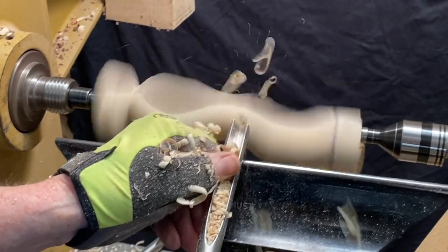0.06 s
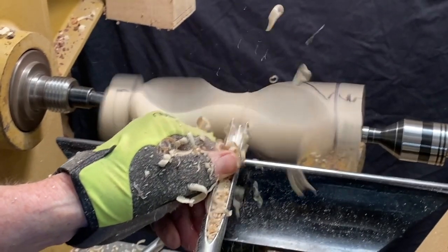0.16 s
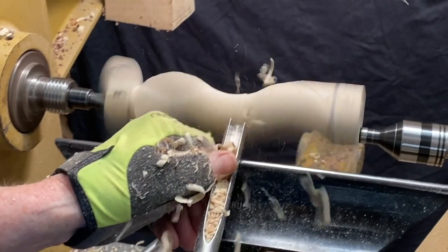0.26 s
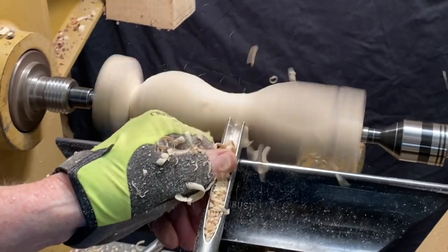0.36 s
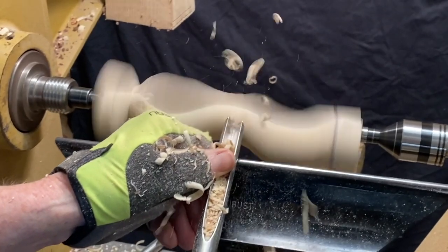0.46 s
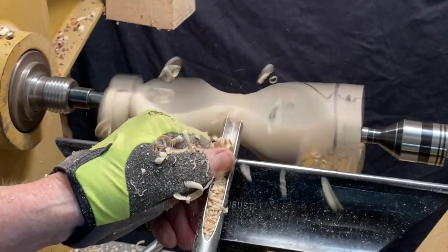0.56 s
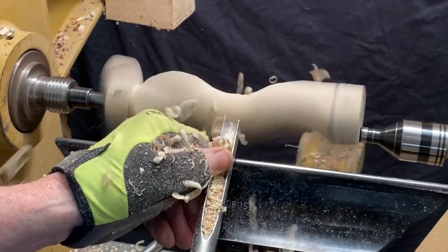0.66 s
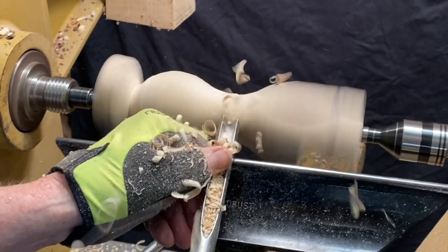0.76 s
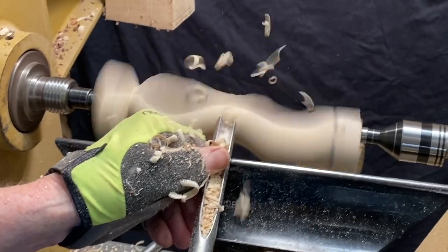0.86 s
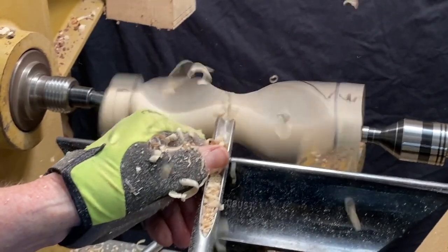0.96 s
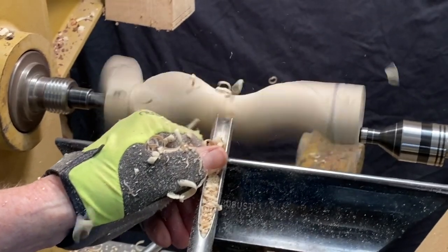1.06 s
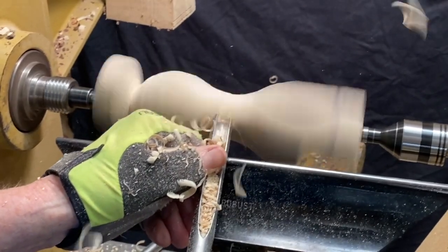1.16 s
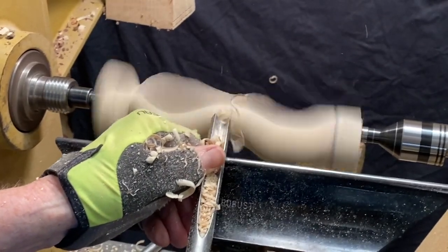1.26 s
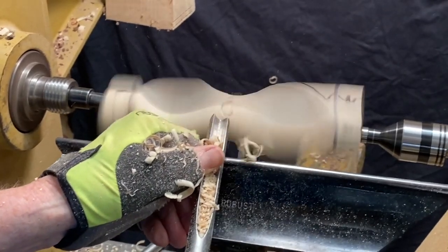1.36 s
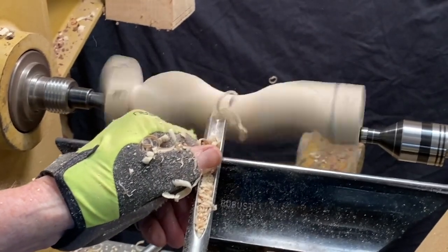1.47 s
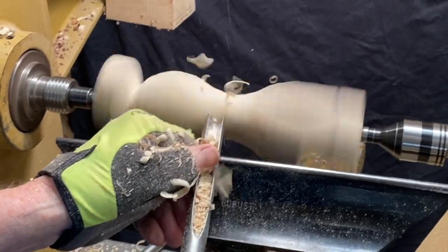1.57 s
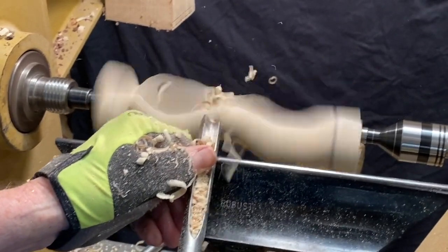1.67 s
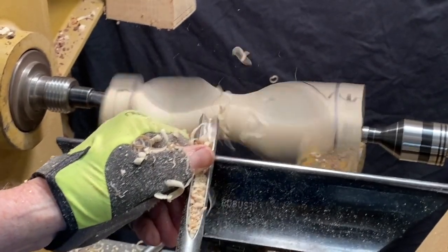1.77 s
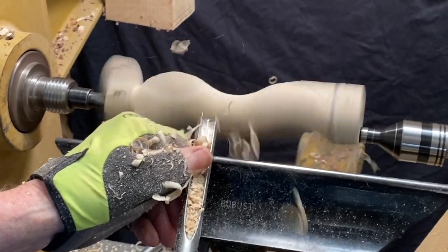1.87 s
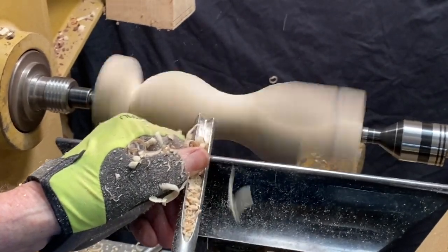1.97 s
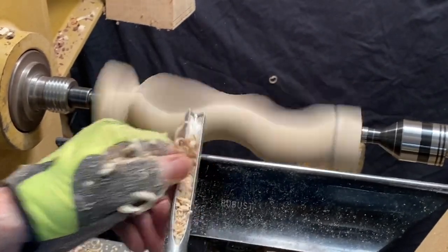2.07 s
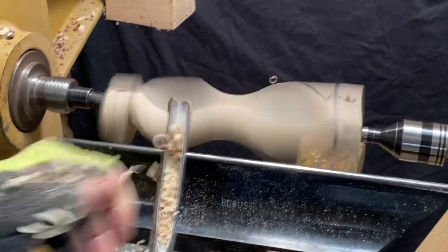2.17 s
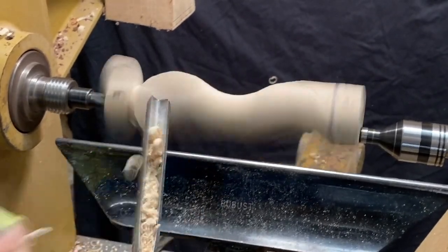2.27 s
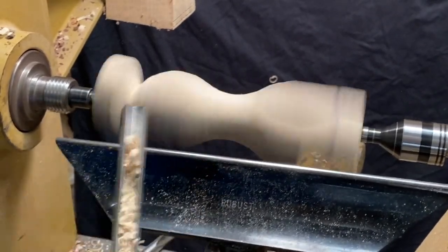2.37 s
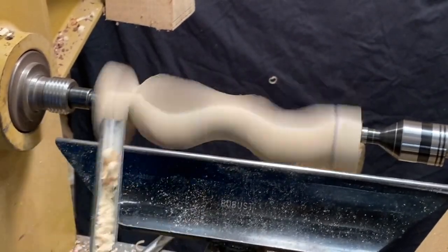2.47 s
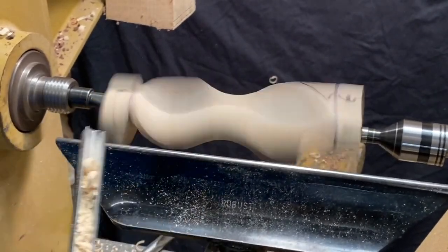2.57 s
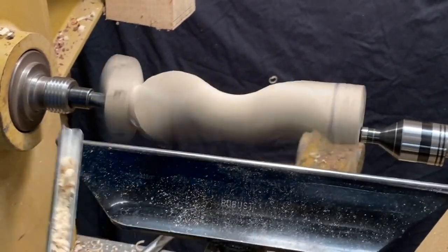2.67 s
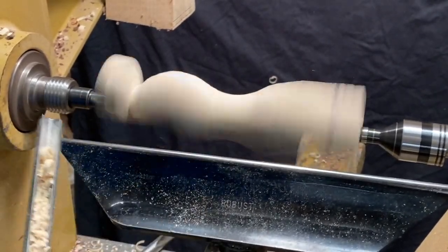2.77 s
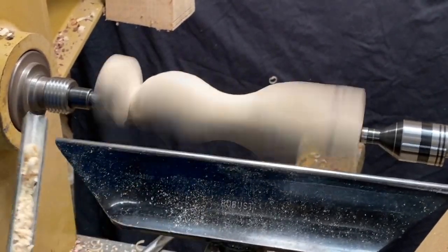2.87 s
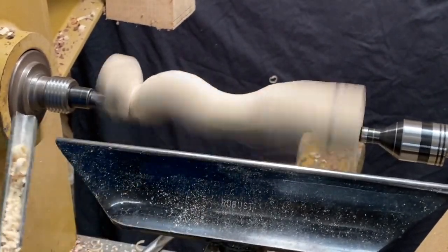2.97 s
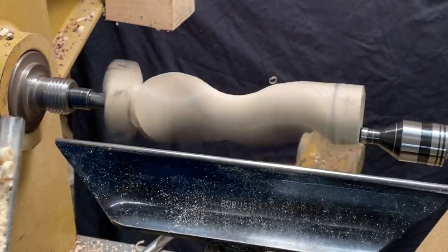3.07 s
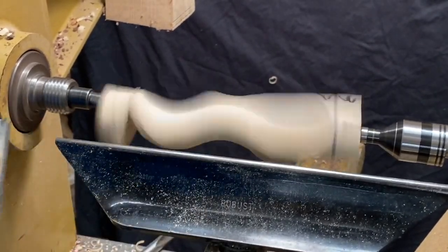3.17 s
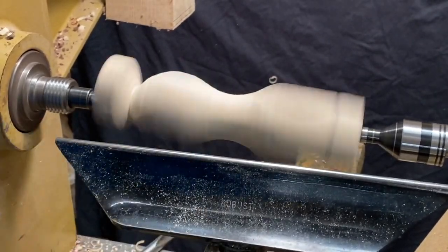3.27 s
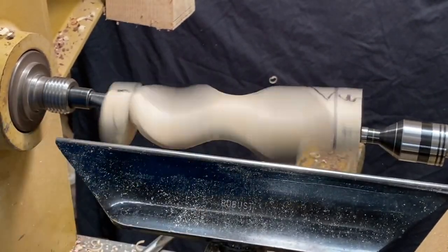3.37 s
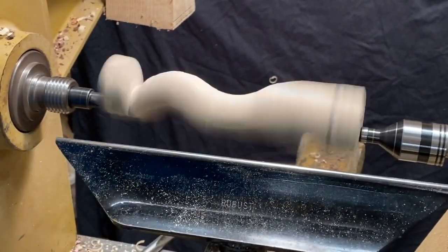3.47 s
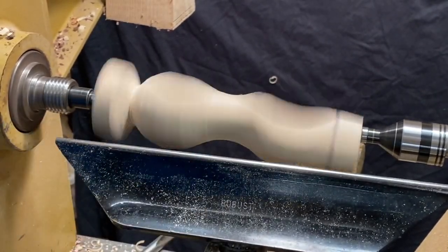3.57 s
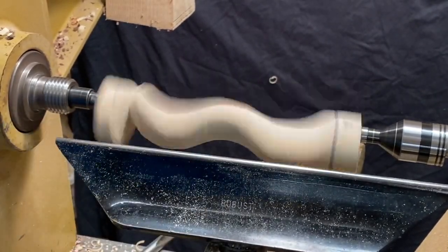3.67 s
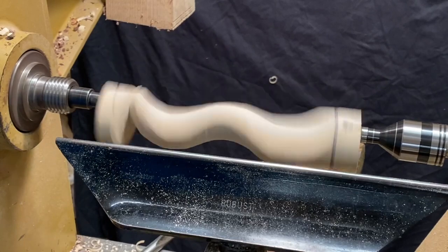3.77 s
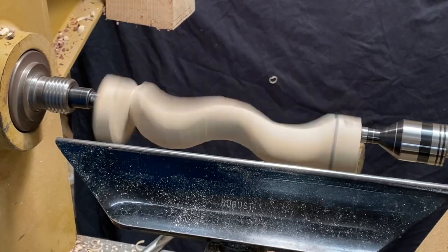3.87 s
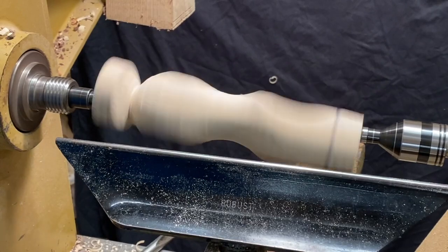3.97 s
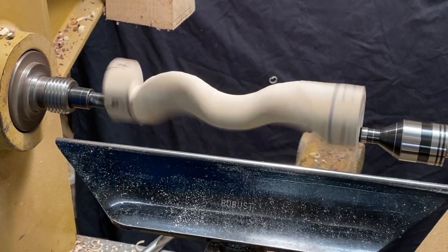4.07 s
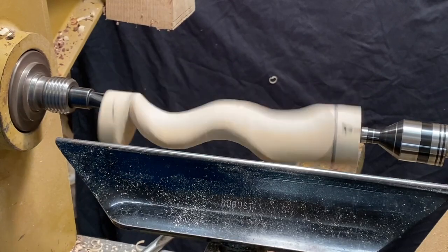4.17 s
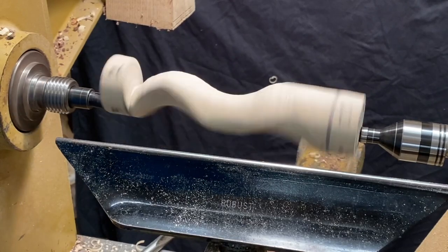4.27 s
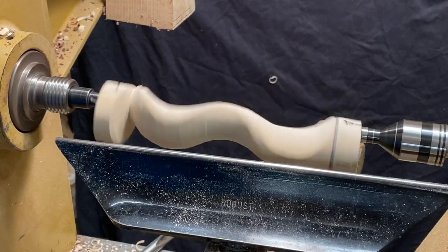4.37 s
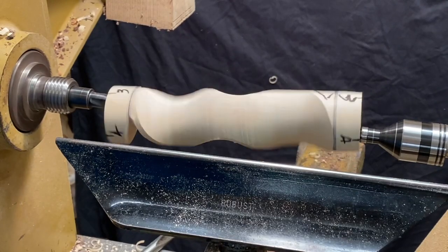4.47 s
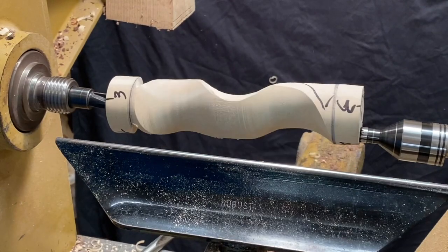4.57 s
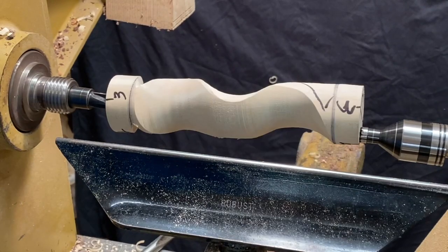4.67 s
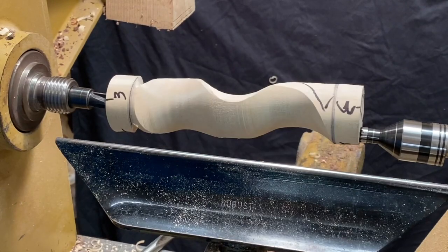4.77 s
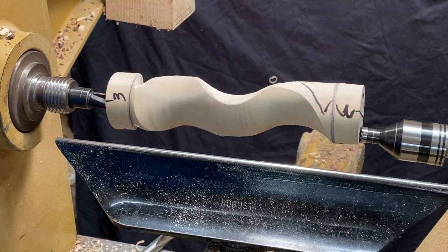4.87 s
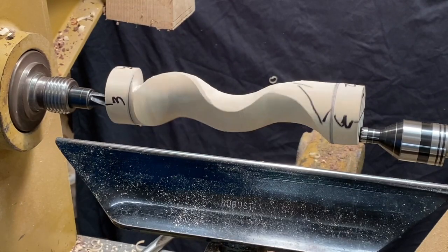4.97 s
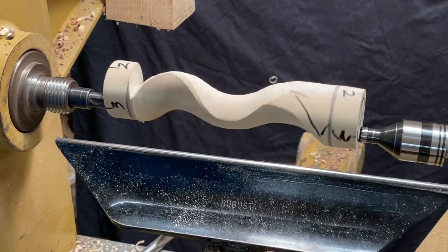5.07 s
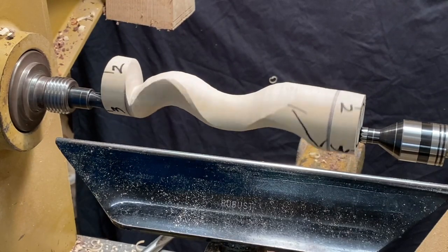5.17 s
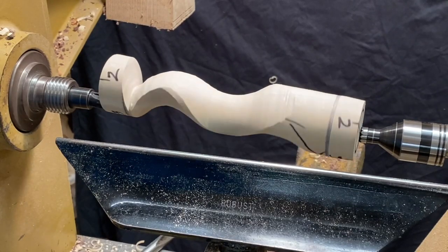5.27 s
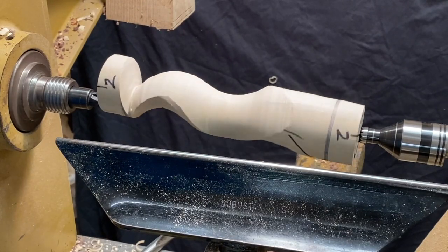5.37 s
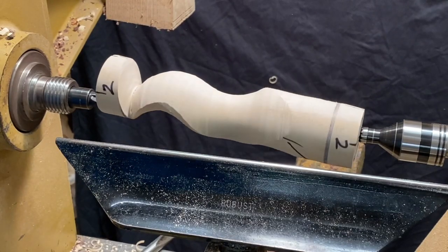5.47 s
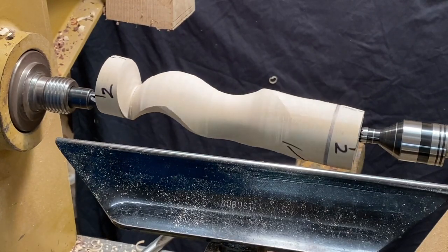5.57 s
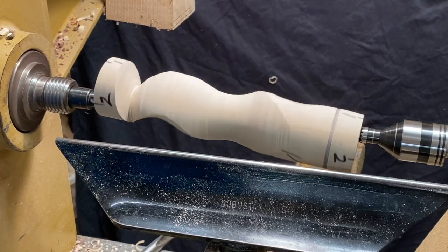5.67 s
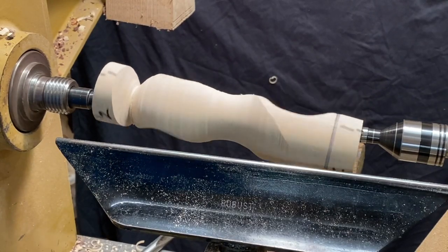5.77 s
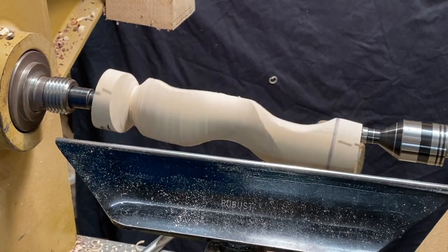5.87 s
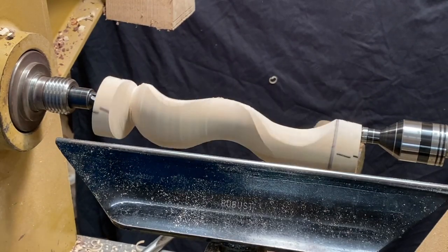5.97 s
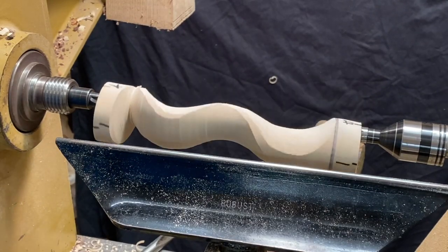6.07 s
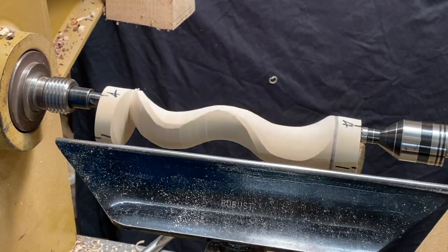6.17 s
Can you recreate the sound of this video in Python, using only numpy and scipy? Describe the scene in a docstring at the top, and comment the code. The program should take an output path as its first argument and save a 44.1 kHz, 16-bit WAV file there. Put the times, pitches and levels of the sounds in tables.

```python
"""A wood lathe turns an off-centre spindle: once a turn it meets the gouge, which knocks, tears and rings.
The gouge lifts, taps the tool rest, and the motor hums on until the stop switch clacks.
The drive then brakes with a thin whistle; the whine slides down through the frame's resonances to a growl.
A beep and a soft clunk mark the stop, and a deep drone swells in the quiet workshop.
Noise through resonant filters makes the cut, and sines locked to the turning make the machine tones."""
import sys
import numpy as np
from scipy import signal
from scipy.fft import rfft, irfft, next_fast_len
from scipy.io import wavfile
from scipy.ndimage import uniform_filter1d, map_coordinates

SR = 44100
rng = np.random.default_rng(int(sys.argv[2]) if len(sys.argv) > 2 else 0)


def store_pcm(level_fs):
    """Save levels as 16-bit WAV."""
    pcm = np.round(np.clip(level_fs, -1, 1) * 32767).astype(np.int16)
    wavfile.write(sys.argv[1], SR, np.atleast_2d(pcm).T)


N = 274302
T = np.arange(N) / SR
# turns of the fast pulley, and cycles of the motor's supply, for each spindle turn
BELT_RATIO, SUPPLY_RATIO = 3.395, 2.5

# The cut over time. Each row: time in seconds, tearing in dB, ring of the gouge in dB, knocking in dB.
CUT_LEVELS = [(0.0, -29.5, -35.5, -32.5), (0.2, -28, -30, -33), (0.4, -30.5, -33, -35.5),
              (0.68, -29.5, -27.5, -32.5), (0.95, -30.5, -33, -35), (1.25, -35, -39, -41),
              (1.48, -31, -37.5, -39), (1.628, -33.5, -49.5, -37), (1.8, -34, -52, -41.5)]
# Tearing of the edge over one turn. Each row: share of a turn, relative level in dB.
TEAR_OVER_TURN = [(0, -6), (.025, 3), (.1, 5), (.23, 0.5), (.31, 4.5), (.53, 4.5), (.6, -4), (.72, -8),
                  (.84, -12), (1, -9.5)]
# Push of the wood over one turn. Each row: share of a turn, relative level in dB.
PUSH_OVER_TURN = [(0, -7.5), (.05, 5.5), (.11, 0), (.17, 3), (.4, 0), (.72, 0.5), (1, -13.5)]
# Turns on which the edge digs deeper or skims. Each row: start in seconds, extra level in dB.
CATCHES = [(.578, 1.5), (.667, 1), (.712, 4), (.845, 2), (.934, 2), (1.157, 1), (1.201, -2), (1.290, -2.5),
           (1.335, 1.5), (1.602, -2.5), (1.691, 2)]
# The gouge sings briefly. Each row: middle in seconds, half length in seconds, pitch in Hz, level in dB.
CHATTER = [(.148, .006, 2580, -21), (.511, .007, 2500, -24), (.638, .007, 2580, -23),
           (.671, .005, 2580, -21), (.720, .012, 2584, -17), (.849, .005, 2508, -20),
           (.940, .007, 2567, -19), (1.04, .006, 2430, -21), (1.165, .006, 2468, -24)]
# Squeaks of the shavings. Each row: middle in seconds, half length in seconds, place as a share of a turn,
# width as a share of a turn, pitch in Hz, relative level in dB.
SQUEAKS = [(.25, 0.21, .3, 0.093, 4257, -32), (.3, 0.33, 0.37, .047, 5540, -37.5),
           (.25, .3, .5, 0.04, 3490, -38.5), (1.62, 0.3, .35, .2, 5490, -43.5)]
# Spectrum of the tearing. Each row: frequency in Hz, relative density in dB per Hz.
TEAR_COLOUR = [(100, -17.5), (400, -15.5), (900, -2), (1500, -0.5), (2000, -1.5), (2800, -5.5), (4200, -1),
               (6500, -2), (10700, 0), (12500, -2), (15000, -0.5)]
# Spectrum of the knocking. Each row: frequency in Hz, relative density in dB per Hz.
KNOCK_COLOUR = [(30, -26), (100, -9), (200, -8.5), (450, -4.5), (660, -10), (900, 0.5), (1250, -4),
                (1550, -3), (2200, -2.5), (4000, -5.5), (9000, -32)]
# Spectra of the scrape in the knock and of the gouge's ring. Each row: frequency in Hz, relative level in dB.
SCRAPE_COLOUR = [(150, -9.5), (500, -3.5), (1000, 3.5), (2500, -2.5), (9000, -8.0)]
RING_COLOUR = [(1500, -41.5), (2300, 4.0), (2500, 2.0), (2680, -1.5), (3300, -32.5)]
# Resonances of the gouge in the tearing. Each row: frequency in Hz, width in Hz, lift in dB.
GOUGE_MODES = [(1860, 57, 11), (2978, 100, 11.5), (3464.5, 97, 8), (3770, 93, 8), (4479, 190, 4),
               (5070, 130, -2.5), (5490, 180, 12.5), (8660, 307, 14)]
# Resonances of the workpiece. Each row: frequency in Hz, width in Hz, lift in dB.
WORKPIECE_MODES = [(135, 10, 10.5), (202, 12, 15), (362, 14, 16.5), (384, 28, 13.5), (449, 20, 12),
                   (584, 14, 15.5), (705, 60, 4), (832, 14, 6), (896, 45, 8.5), (1135, 40, 11.5),
                   (1238, 18, 8), (1368, 24, 10), (1660, 30, 5), (1956, 30, 8.5), (2200, 25, 9)]
# Resonances in the ring of the gouge. Each row: frequency in Hz, width in Hz, lift in dB.
RING_MODES = [(2322, 30, 16), (2425, 44, 27), (2490, 40, 23), (2556, 40, 32.5), (2612, 55, 25)]
# Spectrum of the tap on the tool rest. Each row: frequency in Hz, relative level in dB.
TAP_COLOUR = [(1500, -16), (4000, -6), (5500, 0.5), (11000, -1), (15000, 2)]

# Touch, slide, snap, end stop and rebound of the stop switch.
# Each row: start in seconds, crack in dB, ring of the box in dB.
SWITCH_EVENTS = [(2.6001, -28, -32.5), (2.6148, -28.5, -40), (2.6173, -14.5, -16), (2.6232, -33, -19.5),
                 (2.646, -36.5, -36)]
# Modes of the switch box. Each row: frequency in Hz, relative level in dB, t60 in seconds.
SWITCH_BOX_MODES = [(370, -18, 0.11), (518, -6, 0.1), (644, 5, 0.074), (706, 10.5, 0.069), (786, -6, 0.091),
                    (1150, 1, 0.09), (1265, 14, 0.041), (1730, -10, 0.08), (1890, -3, 0.07),
                    (2073, -8, 0.11), (2350, -5, 0.13), (2560, -12, 0.13), (2780, -12, 0.13),
                    (3810, 11, 0.06), (4716, -6.5, 0.1)]
# Spectrum of the switch's snap. Each row: frequency in Hz, relative density in dB per Hz.
CRACK_COLOUR = [(200, -9), (1200, -8.5), (2700, 2), (4500, -2.5), (7000, -3.5), (11000, -8.5),
                (15500, -11.5)]
# Spectrum of the rattling box. Each row: frequency in Hz, relative level in dB.
RATTLE_COLOUR = [(150, -12.0), (400, 3.0), (1400, -5), (3500, -9.5), (5500, -19.0), (15000, -20.0)]
# Light ticks of the tool and the slowing spindle. Each row: start in seconds, level in dB.
TICKS = [(2.14, -51), (2.525, -52), (3.662, -50), (4.132, -55), (4.334, -56)]

# Whine of the motor. Each row: multiple of the supply rate, relative level in dB under power, and in dB braking.
WHINE_LINES = [(4, -13, -8), (8, -15, -13.5), (13, -12, -11), (18, -4.5, 6.5), (19, -10, -2.5),
               (20, 2.5, -2), (21, -4, -8.5), (22, -13, 2.5), (24, 0.5, 9), (25, -16, -4.5)]
# Spectrum that colours the whine. Each row: frequency in Hz, relative level in dB.
WHINE_COLOUR = [(40, -26.5), (140, -6), (240, -4.5), (340, -5), (460, -1.5), (560, -3), (700, -8.5),
                (850, -7), (930, -1.5), (1000, -5), (1100, 0.5), (1250, -8), (2000, -14)]
# Resonances of the frame. Each row: frequency in Hz, width in Hz, lift in dB.
FRAME_MODES = [(150, 30, 8), (462, 34, 10), (716, 35, 5.4), (944, 15, 15), (1114, 61, 14),
               (1780, 153.4, 4.6)]
# Sidebands of the drive's switching tone. Each row: distance from it as a multiple of the supply rate,
# relative level in dB under power, and in dB braking.
SIDEBANDS = [(23, 0, 4), (21, -7, 3), (19, -9, -2), (17, -16, -5), (15, -16, -5), (13, -16, -7),
             (9, -11, -3), (7, -10, -6), (5, -6, -8), (3, 1, -3), (1, -4, -3), (-1, .5, 3), (-3, -1.5, 0),
             (-5, -6, -7), (-9, -16, -10), (-16, -6, -10), (-21, -11, -8)]
# Spectrum of the drive's electronic hiss. Each row: frequency in Hz, relative density in dB per Hz.
SWITCHING_HISS = [(6000, -40.5), (10000, -3.5), (12000, -1), (15500, -2)]
# Tones of unbalance. Each row: multiple of spindle speed, relative level in dB.
UNBALANCE = [(2, 10), (BELT_RATIO, 0), (4, 0), (2 * BELT_RATIO, -3)]
# Response of floor and stand. Each row: frequency in Hz, gain in dB.
MOUNTS = [(25, -58), (38, -47), (45, -30.5), (52, -31), (60, -22), (65, -16), (68, 0.5), (73, 2.5), (77, 0),
          (82, -4.5), (88, -25.5), (150, -24.5), (300, -41)]
# Spectrum of the bearings. Each row: frequency in Hz, relative density in dB per Hz.
RUMBLE_COLOUR = [(25, -14.5), (60, 7), (120, 0), (200, -5.5), (450, -8.5), (620, -14.5), (1100, -8.5),
                 (1500, -16.5), (2200, -19), (5000, -29)]
# Resonances that the bearings excite in the housing. Each row: frequency in Hz, width in Hz, lift in dB.
HOUSING_MODES = [(149.8, 42, 3.3), (453.7, 21, 7), (714, 46, 6.31), (933, 17, 6.5), (1105, 160, 6.3),
                 (1747, 130, 6.8)]
# Spectrum of the air round the wood. Each row: frequency in Hz, relative density in dB per Hz.
HISS_COLOUR = [(500, -5), (2000, -3.5), (3200, 2), (4500, 1.5), (7000, 3.5), (8900, 6), (9500, 3.5),
               (11200, -0.5), (12200, -7), (15500, -10)]
# Spectrum of the growl. Each row: frequency in Hz, relative density in dB per Hz.
GROWL_COLOUR = [(100, -17), (250, 3.5), (450, 5), (600, -9), (800, -0.5), (1200, -20), (2500, -46)]
# Resonance in the growl. Each row: frequency in Hz, width in Hz, lift in dB.
GROWL_MODE = [(470, 27, 11.0)]
# Spectrum of the thud at the stop. Each row: frequency in Hz, relative level in dB.
THUD_COLOUR = [(100, 7), (500, 1), (750, -7.0), (1050, 4.0), (1300, -12), (1600, -13), (2050, -21),
               (2600, -22), (9000, -25)]
# Modes of the stopping shaft. Each row: frequency in Hz, relative level in dB, t60 in seconds.
STOP_MODES = [(450, -6, 0.24), (498, -8, 0.2), (577, -2.5, 0.28), (722, -12, 0.2), (930, 0.5, 0.27),
              (1050, 3, 0.065), (1455, -9.5, 0.2), (1620, -6, 0.11), (2030, -13, 0.12)]

# Spectrum of the room's air. Each row: frequency in Hz, relative level in dB.
ROOM_AIR = [(20, -14), (50, 2), (100, -5), (160, -12), (400, -17), (800, -20), (1200, -33), (2500, -39.5),
            (8000, -41), (15500, -48)]
# Steady tones in the workshop. Each row: frequency in Hz, relative level in dB.
ROOM_HUM = [(360, -83), (479, -83), (721, -87), (839.8, -79), (958, -90), (1319, -100)]
# Reverberation of the workshop. Each row: frequency in Hz, t60 in seconds before the life factor.
SHOP_DECAY = [(200, 0.68), (1000, 0.46), (4000, 0.27), (12000, 0.06)]
# Stereo width of machine and room. Each row: frequency in Hz, side gain in dB.
WIDTH = [(30, -9.5), (70, -16), (150, -17), (300, -15), (550, -5), (950, -5.5), (1500, -22.5),
         (3000, -39.5), (8000, -30), (15000, -18.5)]
# Stereo width of the cut and the clicks. Each row: frequency in Hz, side gain in dB.
CUT_WIDTH = [(30, -14), (70, -22.5), (150, -18), (300, -20), (550, -14.5), (950, -9), (1700, -24.5),
             (2500, -21.5), (6000, -21.5), (10000, -13.5), (15000, -10)]
# Phase lead of the left microphone port. Each row: frequency in Hz, lead in radians.
PORT_LEAD = [(7900, 0), (8150, 1.9), (9000, 1.9), (10400, 0), (11800, 0), (12900, -np.pi), (13900, -np.pi),
             (15100, -2 * np.pi)]

RUN_TURNS_PER_S = 22.475  # spindle speed under power
BRAKE_S, BRAKE_TURNS_PER_S2, BRAKE_RISE_S = 2.65, 11.3, 0.4  # the braking current builds up over the rise
LIFT_S, TAP_S = 1.84, 1.9325  # the gouge has left the wood; it taps the tool rest
DRIVE_OFF_S, STOP_S = 4.505, 4.526  # the drive stops switching; the shaft comes to rest
RUN_OUT_DB_PER_S = 171  # the running noises die once the shaft rests
# running noises: level at full speed in dB, growth in dB for tenfold speed, extra dB while braking
HUM_DB, HUM_DB_PER_DECADE = -32, 35
RUMBLE_DB, RUMBLE_DB_PER_DECADE = -46, 27.5
HISS_DB, HISS_DB_PER_DECADE = -59, 9
WHINE_DB, WHINE_DB_PER_DECADE, WHINE_BRAKING_DB = -53, 9, 4
WHISTLE_DB, WHISTLE_DB_PER_DECADE, WHISTLE_BRAKING_DB = -69.5, 11.5, 9.5
SWITCHING_HZ, SWITCHING_HISS_DB = 9993, -76  # the hiss is the same at any speed
GROWL_DB, GROWL_PEAK_S, GROWL_SWELL_S = -59, 4.05, 0.44
DRONE_DB, DRONE_START_S, DRONE_RISE_S = -58.5, 4.77, 0.65
ENTRY_DB, ENTRY_S = 2.5, 0.0053  # the first fibres break with a crack
STRIKE_DB = 23.5  # the wood's arrival strikes the gouge, once a turn
CHIP_COLOUR_DB = 1.5  # spread of colour among the shavings
SNAPS_PER_S, SNAP_DB = 420, -3
SNAP_HZ, SNAP_OCTAVES, SNAP_CYCLES = 4800, .7, 7  # middle pitch, spread, cycles in which a snap fades
TAP_DB = -30  # peak
STOP_RISE_S = 0.0034  # the clunk comes on softly
TOP_HZ = 15790  # band limit


def amp(db):
    """Level: decibels give the ratio of amplitudes."""
    return 10 ** (np.asarray(db) / 20)


def unit(x):
    """Normalisation: a signal is brought to rms 1."""
    return x / np.sqrt(np.mean(x ** 2) + 1e-20)


def along(points, hz):
    """Interpolation: (Hz, value) points are joined on a logarithmic frequency axis."""
    f, v = np.transpose(points)
    return np.interp(np.log(hz + 1), np.log(f + 1), v)


def curves(rows):
    """Interpolation: each column after the time becomes one value per sample."""
    s, *columns = np.transpose(rows)
    return [np.interp(T, s, column) for column in columns]


def wobble(rate):
    """Random modulation: a smooth curve follows random knots, rate of them a second."""
    knots = rng.standard_normal(int(N * rate / SR) + 4)
    return map_coordinates(knots, [T * rate])


def filtered(x, response):
    """Linear filtering: the spectrum is multiplied by a complex response of frequency."""
    size = next_fast_len(N + SR // 2)
    return irfft(rfft(x, size) * response(np.fft.rfftfreq(size, 1 / SR)), size)[..., :N]


def body(x, spectrum, resonances=()):
    """Minimum-phase resonance: a folded cepstrum makes a causal filter, lifted at each resonance."""
    size = 2 * next_fast_len(N // 2 + SR // 4)
    hz = np.fft.rfftfreq(size, 1 / SR)
    lift = 1
    for centre, width, db in resonances:
        lift = lift + (amp(db) ** 2 - 1) / (1 + (2 * (hz - centre) / width) ** 2)
    gain = amp(along(spectrum, hz)) * np.sqrt(np.abs(lift))
    cepstrum = irfft(np.log(gain + 1e-6))
    cepstrum[1:size // 2] *= 2
    cepstrum[size // 2 + 1:] = 0
    return irfft(rfft(x, size) * np.exp(rfft(cepstrum)))[:N]


def decay(s, t60):
    """Exponential damping: a unit step at s falls 60 dB in t60."""
    return (T >= s) * amp(-60 * np.abs(T - s) / t60)


def ringing(s, modes):
    """Modal vibration: a blow at s sets off damped sines."""
    return sum(amp(db) * decay(s, t60) * np.sin(2 * np.pi * hz * (T - s)) for hz, db, t60 in modes)


def tones(turns, orders, blur, rate, carrier_hz=0):
    """Order lines: each sine is locked to the turning and its phase wanders by blur radians."""
    out = np.zeros(N)
    for order, db in orders:
        cycles = carrier_hz * T + order * turns + rng.random()
        out += amp(db) * np.sin(2 * np.pi * cycles + blur * wobble(rate))
    return out


def spindle():
    """Uniform deceleration: steady turns a second, an even fall under the brake, then rest."""
    slowed = BRAKE_TURNS_PER_S2 * np.maximum(T - BRAKE_S, 0)
    return (RUN_TURNS_PER_S - slowed) * (T < STOP_S)


def with_speed(speed, db, db_per_decade):
    """Power law: a running noise grows with speed, down to a tenth of full, and dies after the stop."""
    decades = np.log10(np.maximum(speed / RUN_TURNS_PER_S, .1))
    return amp(db + db_per_decade * decades - RUN_OUT_DB_PER_S * np.maximum(T - STOP_S, 0))


def gouge(turns):
    """Intermittent cutting: off-centre wood meets the edge for a little over half of every turn."""
    tear_db, ring_db, knock_db = curves(CUT_LEVELS)
    angle = (turns + .004) % 1
    bite = unit(amp(np.interp(angle, *np.transpose(TEAR_OVER_TURN))))
    entry = amp(ENTRY_DB) * np.exp(-angle / RUN_TURNS_PER_S / ENTRY_S)
    knock = knocking(angle) * amp(knock_db)
    steel = tearing(bite, entry) * amp(tear_db) + edge_ring(angle, bite, entry) * amp(ring_db)
    # the wood stiffens the steel while it presses, and each shaving loads it differently
    stiffness = .006 * bite + .007 * wobble(25)
    singing = np.minimum(bite, 1) ** 2 * chatter()
    contact = np.clip((LIFT_S - T) / 0.045, 0, 1)
    return contact * (knock + bent(steel, stiffness) + singing + squeaks(angle))


def knocking(angle):
    """Forced vibration: the same surface bumps come round every turn, under a fresh scrape."""
    push = unit(amp(np.interp(angle, *np.transpose(PUSH_OVER_TURN))))
    share = np.linspace(0, 1, 1000)
    relief = rng.standard_normal(len(share)) * amp(np.interp(share, *np.transpose(PUSH_OVER_TURN))) ** 2
    # keeping only the phases makes every multiple of the turning rate equally strong
    surface = irfft(np.exp(1j * np.angle(rfft(relief))))
    bumps = unit(map_coordinates(surface, [angle * len(surface)], mode="grid-wrap"))
    scrape = unit(body(push * fibres(spread_db=4.5), SCRAPE_COLOUR))
    force = amp(0.72 * wobble(60)) * (bumps * np.sqrt(push) + amp(-7.5) * scrape)
    return unit(body(force, KNOCK_COLOUR, WORKPIECE_MODES))


def tearing(bite, entry):
    """Fracture noise: breaking fibres excite the gouge, more strongly where the edge digs deeper."""
    depth = amp(1.3 * wobble(160) + sum(db * decay(s, t60=0.06) for s, db in CATCHES))
    breaking = patchy(fibres(spread_db=1.0), CHIP_COLOUR_DB) + snaps()
    return unit(body(depth * np.hypot(bite, entry) * breaking, TEAR_COLOUR, GOUGE_MODES))


def edge_ring(angle, bite, entry):
    """Impulse and noise excitation: a strike each turn and the fibres drive the gouge's modes."""
    strike = amp(STRIKE_DB) * (np.diff(angle, prepend=0) < 0)
    rubbing = np.hypot(bite ** 1.6, entry) * fibres(spread_db=2.0)
    return unit(body(strike + rubbing, RING_COLOUR, RING_MODES))


def fibres(spread_db):
    """Amplitude-modulated noise: dense snaps of wood fibres vary in size."""
    return rng.standard_normal(N) * amp(spread_db * wobble(2500))


def patchy(x, depth_db):
    """Spectral modulation: brief random patches are brighter or duller, as shavings tear differently."""
    z = signal.stft(x, nperseg=256)[2]
    field = uniform_filter1d(rng.standard_normal(z.shape), size=7, axis=0)
    field = uniform_filter1d(field, size=4, axis=1)
    return signal.istft(z * amp(depth_db * unit(field)), nperseg=256)[1][:N]


def snaps():
    """Granular impulses: single fibres break as damped sines of random time, pitch and size."""
    start, pitch, size = np.split(rng.random((int(SNAPS_PER_S * N / SR), 3)), 3, axis=1)
    t = np.arange(SR // 100) / SR
    hz = SNAP_HZ * 2 ** (SNAP_OCTAVES * np.sqrt(3) * (2 * pitch - 1))
    damping = np.exp(-hz * t / SNAP_CYCLES)
    grains = amp(10 * size) * np.sqrt(hz) * damping * np.sin(2 * np.pi * hz * t)
    at = (start * N).astype(int) + np.arange(len(t))
    return amp(SNAP_DB) * unit(np.bincount(at.ravel(), grains.ravel(), N)[:N])


def bent(x, sharpen):
    """Frequency modulation: uneven reading shifts the pitch by a small share about its local mean."""
    shift = np.cumsum(sharpen - uniform_filter1d(sharpen, SR // 5))
    return map_coordinates(x, [np.arange(N) + shift], mode="mirror")


def chatter():
    """Self-excited vibration: now and then the edge locks into the wood and the gouge sings."""
    flutter = .35 * wobble(200)
    out = np.zeros(N)
    for s, length, hz, db in CHATTER:
        out += amp(db) * np.exp(-((T - s) / length) ** 2) * np.sin(2 * np.pi * hz * T + flutter)
    return out


def squeaks(angle):
    """Narrow-band squeal: shavings sound at the same angle over several turns."""
    out = np.zeros(N)
    for s, length, at, width, hz, db in SQUEAKS:
        squeal = np.sqrt(8) * np.sin(2 * np.pi * hz * T + 1.3 * wobble(350))
        window = np.exp(-((angle - at) / width) ** 2 - ((T - s) / length) ** 2)
        out += amp(db + 2.6 * wobble(25)) * window * squeal
    return out


def tap():
    """Impact: steel on steel gives a bright little click that rings the gouge."""
    touch = body(rng.standard_normal(N) * decay(TAP_S, t60=0.025), TAP_COLOUR, GOUGE_MODES)
    return amp(TAP_DB) * touch / np.max(np.abs(touch))


def crack_noise():
    """Broadband excitation: coloured noise supplies the switch's cracks and the ticks."""
    return unit(body(rng.standard_normal(N), CRACK_COLOUR))


def switch():
    """Impact and modal response: each contact of the switch cracks and rings its box."""
    crack = crack_noise()
    rattle = unit(body(rng.standard_normal(N), RATTLE_COLOUR))
    out = np.zeros(N)
    for s, crack_db, box_db in SWITCH_EVENTS:
        box = amp(-18.0) * ringing(s, SWITCH_BOX_MODES) + amp(-17.0) * rattle * decay(s, t60=0.18)
        onset = 1 - decay(s, t60=0.026)
        out += amp(crack_db) * crack * decay(s, t60=0.014) + amp(box_db) * onset * box
    return out


def ticks():
    """Light impacts: the tool and the slowing spindle give short bursts of noise."""
    return crack_noise() * sum(amp(db) * decay(s, t60=0.033) for s, db in TICKS)


def motor(speed, turns):
    """Unbalance: the stand answers most near one pitch, so each tone swells as it slides through."""
    hum = np.zeros(N)
    for order, db in UNBALANCE:
        hum += amp(along(MOUNTS, order * speed)) * tones(turns, [(order, db)], blur=0.2, rate=2.7)
    return hum * with_speed(speed, HUM_DB, HUM_DB_PER_DECADE)


def supply_tones(table, turns, braking, waver, fade_db, carrier_hz=0):
    """Harmonic excitation: braking shifts load among the supply's multiples and makes them waver more."""
    out = np.zeros(N)
    unrest = .35 + .65 * braking
    for multiple, driven_db, braked_db in table:
        level_db = driven_db + (braked_db - driven_db) * braking + unrest * fade_db * wobble(13)
        orders = [(round(multiple) * SUPPLY_RATIO, 0)]
        out += amp(level_db) * tones(turns, orders, waver * unrest, rate=45, carrier_hz=carrier_hz)
    return out


def whine(speed, turns, braking):
    """Resonance: the motor's tones swell as they pass the resonances of the frame."""
    lines = supply_tones(WHINE_LINES, turns, braking, waver=.55, fade_db=2)
    lines = lines * amp((1 + 1.5 * braking) * wobble(170))
    level = with_speed(speed, WHINE_DB + WHINE_BRAKING_DB * braking, WHINE_DB_PER_DECADE)
    return unit(body(lines, WHINE_COLOUR, FRAME_MODES)) * level


def drive(speed, turns, braking):
    """Carrier modulation: sidebands round the switching tone whistle, much louder in braking."""
    whistle = supply_tones(SIDEBANDS, turns, braking, waver=1, fade_db=3, carrier_hz=SWITCHING_HZ)
    level = with_speed(speed, WHISTLE_DB + WHISTLE_BRAKING_DB * braking, WHISTLE_DB_PER_DECADE)
    electronics = unit(body(rng.standard_normal(N), SWITCHING_HISS)) * amp(SWITCHING_HISS_DB)
    powered = np.clip((DRIVE_OFF_S - T) / .02, 0, 1)
    return powered * (whistle * level + electronics)


def bearings_and_air(speed, turns):
    """Flow and rolling noise: bearings rumble and air hisses round the wood, swaying once a turn."""
    swish = amp(0.48 * np.sin(2 * np.pi * turns))
    rumble = unit(body(rng.standard_normal(N), RUMBLE_COLOUR, HOUSING_MODES))
    hiss = unit(body(fibres(spread_db=2.0), HISS_COLOUR))
    rumble_level = with_speed(speed, RUMBLE_DB, RUMBLE_DB_PER_DECADE)
    return swish * (rumble * rumble_level + hiss * with_speed(speed, HISS_DB, HISS_DB_PER_DECADE))


def growl(turns):
    """Roughness: at a crawl the braked motor judders and the frame answers with a low growl."""
    judder = amp(1.4 * np.sin(2 * np.pi * BELT_RATIO * turns)) * fibres(spread_db=0.5)
    swell = np.exp(-((T - GROWL_PEAK_S) / GROWL_SWELL_S) ** 2)
    return unit(body(judder, GROWL_COLOUR, GROWL_MODE)) * amp(GROWL_DB) * swell


def standstill():
    """Tone bursts and damped modes: the drive holds the shaft with hum and beep, then a soft clunk."""
    beep = np.sin(2 * np.pi * 7000 * T) + amp(-3) * np.sin(4 * np.pi * 7000 * T)
    beep = amp(-55) * beep * np.exp(-((T - DRIVE_OFF_S) / .016) ** 2)
    hold = np.sin(2 * np.pi * 150 * T) + amp(-1.5) * np.sin(2 * np.pi * 100 * T)
    hold = amp(-56.5) * hold * np.exp(-((T - 4.49) / 0.1) ** 2)
    thud = unit(body(rng.standard_normal(N), THUD_COLOUR)) * decay(STOP_S, t60=0.34)
    clunk = amp(-51) * thud + amp(-53.0) * ringing(STOP_S, STOP_MODES)
    rise = np.clip((T - STOP_S) / STOP_RISE_S, 0, 1)
    return beep + hold + rise * clunk


def walls(x, life):
    """Diffuse reverberation: noise decays at each frequency's own rate; life scales the t60."""
    hz, t, z = signal.stft(rng.standard_normal(SR // 2), SR, nperseg=256)
    fall = amp(-60 * t / (life * along(SHOP_DECAY, hz)[:, None]))
    tail = signal.istft(z * fall, SR, nperseg=256)[1]
    return signal.fftconvolve(x, tail / np.linalg.norm(tail))[:N]


def workshop():
    """Background noise: still air, the hum of other equipment and a late drone, a little to the right."""
    hum = np.zeros(N)
    for hz, db in ROOM_HUM:
        hum += amp(db) * np.sqrt(2) * np.sin(2 * np.pi * hz * T + .2 * wobble(5))
    air, spread = (amp(-67) * unit(body(noise, ROOM_AIR)) for noise in rng.standard_normal((2, N)))
    swell = 1 - np.exp(-np.maximum(T - DRONE_START_S, 0) / DRONE_RISE_S)
    drone = amp(DRONE_DB) * swell * np.sqrt(2) * np.sin(2 * np.pi * 50 * T + .4 * wobble(4))
    mid = (hum + drone) * amp(wobble(6.7)) + air
    side = filtered(spread, lambda hz: amp(along(WIDTH, hz)))
    return np.array([mid + side, mid - side]) * amp([[-.8], [.8]])


def scene():
    """Superposition: cut, machine and their reverberation add to the motor's hum and the workshop."""
    speed = spindle()
    turns = np.cumsum(speed) / SR
    braking = np.clip((T - BRAKE_S) / BRAKE_RISE_S, 0, 1)
    work = gouge(turns) + tap() + switch() + ticks()
    machine = whine(speed, turns, braking) + drive(speed, turns, braking)
    machine = machine + bearings_and_air(speed, turns) + growl(turns) + standstill()
    mid = work + machine + amp(-15) * walls(work + machine, life=1)
    work_side = filtered(walls(work, life=0.81), lambda hz: amp(along(CUT_WIDTH, hz)))
    machine_side = filtered(walls(machine, life=0.81), lambda hz: amp(along(WIDTH, hz)))
    side = work_side + machine_side
    lathe = np.array([mid + side, mid - side]) * amp([[-.1], [.1]])
    return lathe + motor(speed, turns) * amp([[-.4], [.4]]) + workshop()


def record(dry):
    """Phase difference and band limit: the left port leads in the treble; a low-pass ends the band."""
    def ports(hz):
        """Transfer function: left is the reference and right is turned by the lead."""
        lead = np.interp(hz, *np.transpose(PORT_LEAD))
        low_pass = np.clip((TOP_HZ - hz) / 150 + .5, 0, 1)
        return np.array([np.ones_like(hz), np.exp(-1j * lead)]) * low_pass
    return filtered(dry, ports)


dry = scene()
out = record(dry)
store_pcm(out)
```